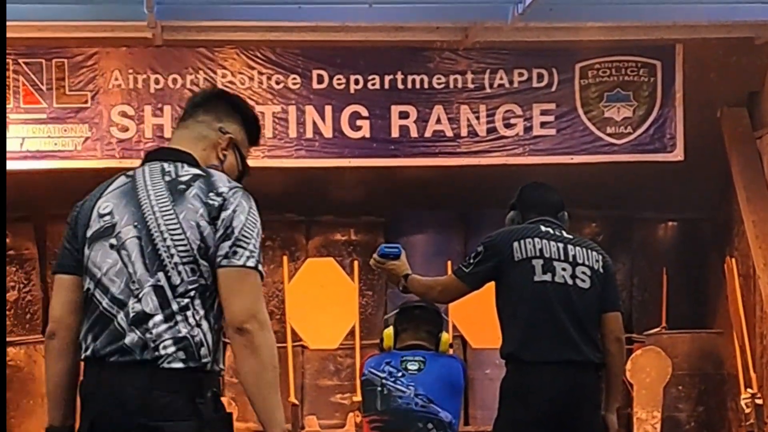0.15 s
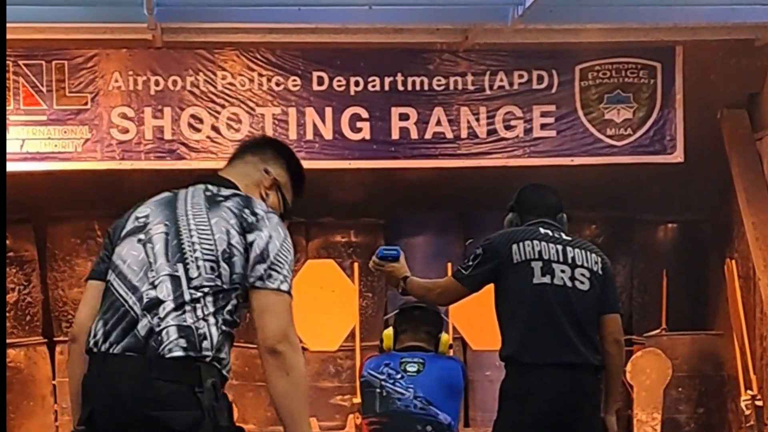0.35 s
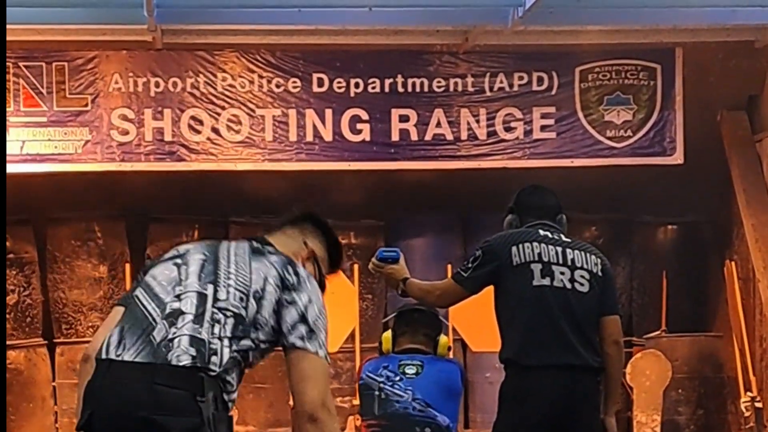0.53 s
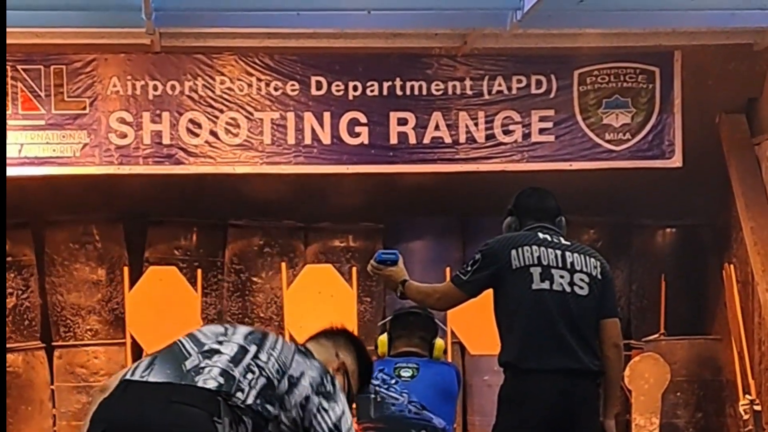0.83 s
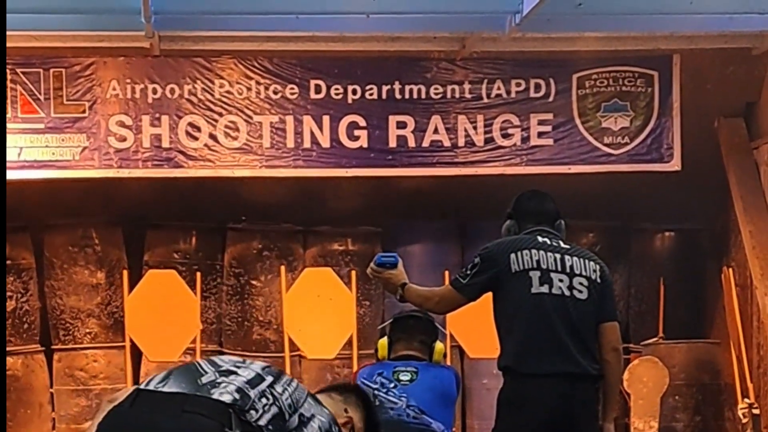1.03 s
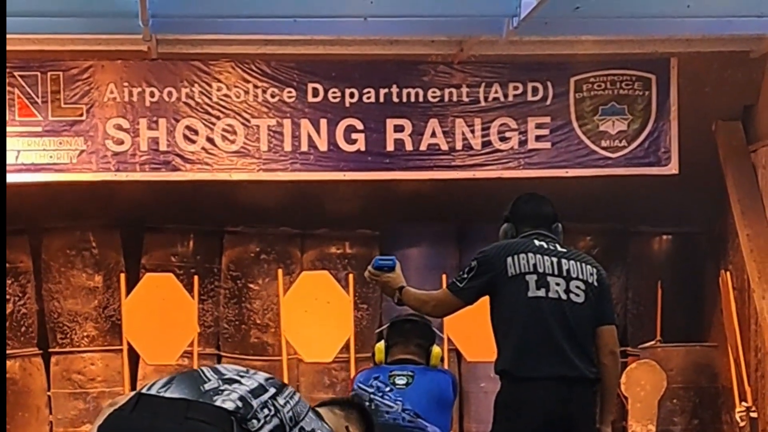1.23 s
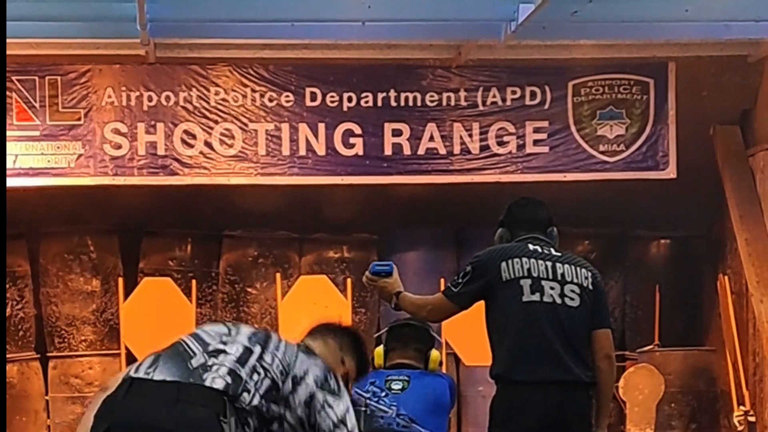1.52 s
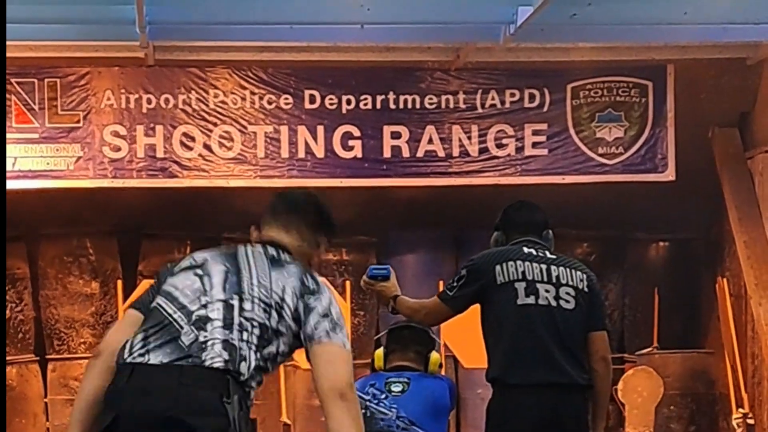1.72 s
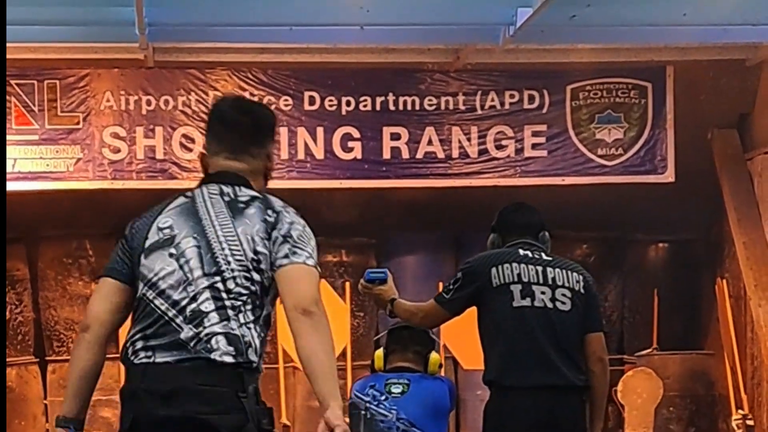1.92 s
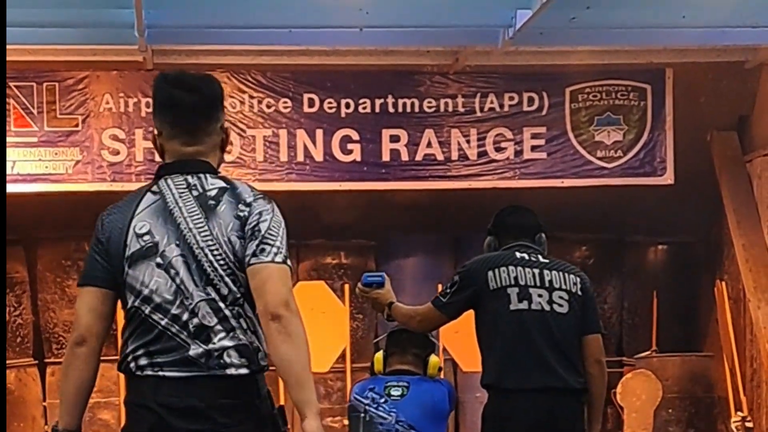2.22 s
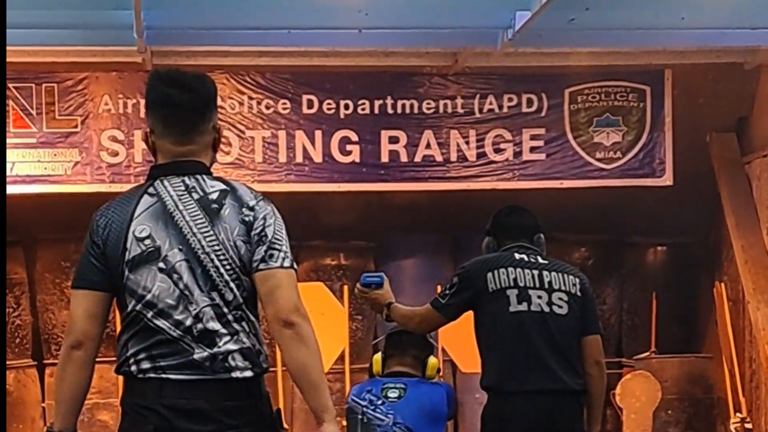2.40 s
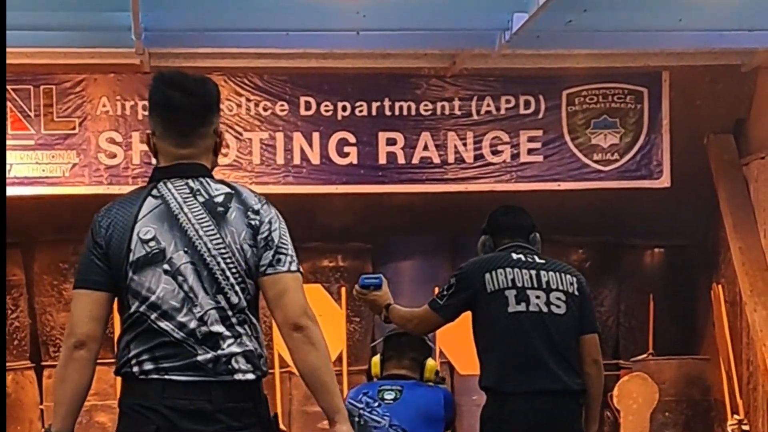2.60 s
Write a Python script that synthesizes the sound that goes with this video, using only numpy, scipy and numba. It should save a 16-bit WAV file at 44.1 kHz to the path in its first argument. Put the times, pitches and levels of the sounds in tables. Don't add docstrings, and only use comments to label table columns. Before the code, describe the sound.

Four loud pistol shots crack and echo in a hard-walled indoor range over faint ventilation rumble

```python
import sys
import numpy as np
from scipy import signal
from scipy.fft import rfft, irfft
from scipy.io import wavfile
from scipy.ndimage import uniform_filter1d, minimum_filter1d
from numba import njit

SR = 44100
rng = np.random.default_rng(int(sys.argv[2]) if len(sys.argv) > 2 else 0)


def generate_wav(signal):
    frames = np.transpose(np.atleast_2d(signal))
    scaled = np.clip(frames, -1, 1) * 32767
    pcm = np.round(scaled).astype(np.int16)
    wavfile.write(sys.argv[1], SR, pcm)


def convert_level_to_amplitude(level_db):
    exponent = np.asarray(level_db, float) / 20
    return 10 ** exponent


N = 121275

# (time [s], aim [0 or 1])
SHOTS = [
    (.23415, 0),
    (.94115, 0),
    (1.78735, 1),
    (2.21495, 1),
]
# (blast and hall level [dB], diaphragm thud level [dB])
SHOT_LEVELS = [
    (0.1, 2.8),
    (0.1, -1.5),
    (0.1, 0.5),
    (0.1, -4),
]

# (delay [s], left level [dB], right level [dB])
NEAR_ECHOES = [(.0008, -4, -8), (.0031, -4, -14.5), (.0048, -2, -12), (.0066, -10, -3.5), (0.0093, 1, -35),
               (0.0133, 12.5, -50), (0.0178, -32, 9), (0.029, -16, -34), (0.039, 6.5, -35), (.057, 19, -10),
               (0.158, -20.5, -10)]
BLAST_S, BLAST_DB, DIRECT_DB = .00042, 2, -1.5
FAR_COUNT, FAR_DB, FAR_SPREAD_DB, FAR_T60_S, FAR_SPAN_S = 70, -14, -2, 1, .4

# (frequency [Hz], time to fall 60 dB [s])
HALL_T60 = [(50, 0.47), (150, 1), (400, 0.86), (1200, 0.67), (3000, 0.63), (8000, 0.69), (12000, 0.55),
            (16000, 0.4)]
# (frequency [Hz], rise time [s])
HALL_RISE = [(60, .01), (200, 0.12), (500, 0.032), (1000, 0.03), (1600, 0.022), (2500, 0.018),
             (6000, 0.0054)]
# (frequency [Hz], level [dB])
HALL_COLOUR = [(20, -50), (60, -17), (200, -5.5), (420, 1), (800, -2), (1300, -3), (1800, -11.5),
               (5000, -18.5)]
# (frequency [Hz], likeness [0-1])
SAME_AIM = [(60, .7), (400, .95), (1500, .85), (4000, .4), (10000, .1)]
# (frequency [Hz], likeness [0-1])
OTHER_AIM = [(60, .7), (400, .75), (1500, .35), (4000, .05)]
# (frequency [Hz], likeness [-1 to 1])
HALL_STEREO = [(60, 1), (180, 1), (550, 0.74), (1650, -0.015), (4970, -0.035), (15000, 0.011)]
HALL_DB, HALL_PATCH_DB = -1, 1.2
HALL_HEAD_START_S = .007
LULL_S, LULL_WIDTH_S, LULL_DEPTH = .0026, .0006, .8

# (frequency [Hz], level [dB])
STANDING_MODES = [
    [(166.9, -39), (199.2, -42.5), (258.4, -36.5), (366.1, -40.5), (409.1, -33), (532.9, -28.5),
     (694.4, -33.5), (775.2, -25), (920.5, -26.5), (1061, -51), (1098, -30), (1233, -32), (1319, -42)],
    [(118.4, -41.5), (199.2, -39), (258.4, -46), (376.8, -34), (409.1, -32), (532.9, -39), (624.5, -37),
     (742.9, -44), (802.1, -22.5), (974.4, -32), (1050, -32), (1292, -29.5), (1480, -52)],
]
STANDING_DB, STANDING_RISE_S, PORT_GAP_S = 16.5, .025, .00044
STANDING_LIFE, DRIFT_RAD = .8, .04

# (frequency [Hz], level per Hz [dB])
AIR_COLOUR = [(15, -8.5), (60, 2.5), (150, -7), (300, -8.5), (1300, -17.5), (2400, -32), (12000, -38),
              (15500, -50)]
# (frequency [Hz], likeness [-1 to 1])
AIR_STEREO = [(60, 0.99), (240, 0.97), (950, 0.32), (3770, -0.23), (15000, -0.072)]
AIR_DB, AIR_PATCH_DB = -50, .4

# (frequency [Hz], level [dB])
SLAM_COLOUR = [(15, -38), (30, -26), (50, -7), (90, -5.5), (160, -14.5), (300, -24.5), (1000, -81)]
SLAM_DB = [-24.5, -33]
SLAM_HOLD_S, SLAM_T60_S = .085, .12

# (frequency [Hz], level [dB])
HOUSING = [(2000, -0.5), (2700, 1.5), (3500, -1.5), (4300, 2), (6500, 1), (7700, -2.5), (13300, 2.5),
           (15500, 8.5)]
# (frequency [Hz], level [dB])
LEFT_PORT = [(60, 2), (1000, -1), (3000, 1.5), (6500, -0.5), (8700, -1.5), (12000, -7.5), (14500, -11.5),
             (16500, -21)]
# (frequency [Hz], level [dB])
RIGHT_PORT = [(60, 1.5), (1000, 2), (3000, 6), (5500, 7.5), (7200, 8), (8700, -3.5), (11800, 10.5),
              (15500, -7)]
# (frequency [Hz], level [dB])
BAND_LIMITS = [(12, -20), (45, 0), (15800, 0), (15950, -36), (16800, -44), (16900, -95)]
KNEE_DB, SHARPNESS, RELEASE_S = [-3, -6.5], [2.53, 3.55], [.0067, .01]
ATTACK_S, AHEAD_SAMPLES = .00034, 40
CLIP_LEVEL, CLIP_HARDNESS = .93, 14


def along(points, hz):
    point_hz, value = np.transpose(points)
    return np.interp(np.log(hz + 1), np.log(point_hz + 1), value)


def causal(x, points):
    size = 8192
    log_gain = np.log(convert_level_to_amplitude(along(points, np.fft.rfftfreq(size, 1 / SR))))
    cepstrum = irfft(log_gain, size)
    cepstrum[1:size // 2] *= 2
    cepstrum[size // 2 + 1:] = 0
    impulse = irfft(np.exp(rfft(cepstrum)), size)[:size // 2]
    return signal.fftconvolve(x, impulse)[:len(x)]


def blend(a, b, alike):
    alike = np.clip(alike, -1, 1)
    return alike * a + np.sqrt(1 - alike ** 2) * b


def noise_pair(length, alike):
    a, b = rfft(rng.standard_normal((2, length)))
    likeness = along(alike, np.fft.rfftfreq(length, 1 / SR))
    turn = np.arccos(np.clip(likeness, -1, 1)) / 2
    middle, side = np.cos(turn) * a, np.sin(turn) * b
    return np.array([middle + side, middle - side])


def fade(x, gain, size):
    hz, t, spectra = signal.stft(x, SR, nperseg=size)
    return signal.istft(spectra * gain(hz, t), SR, nperseg=size)[1][..., :x.shape[-1]]


def patches(shape, depth_db):
    field = uniform_filter1d(rng.standard_normal(shape), size=4, axis=-2)
    field = uniform_filter1d(field, size=8, axis=-1)
    return convert_level_to_amplitude(depth_db * field / field.std())


def ventilation():
    colour = convert_level_to_amplitude(along(AIR_COLOUR, np.fft.rfftfreq(N, 1 / SR)))
    air = irfft(noise_pair(N, AIR_STEREO) * colour, N)
    air = fade(air, lambda hz, t: patches((len(hz), len(t)), AIR_PATCH_DB), size=512)
    return convert_level_to_amplitude(AIR_DB) * air / air.std()


def blast(far):
    u = np.arange(SR // 50) / SR / BLAST_S
    pressure = (1 - u) * np.exp(-u)
    echoes = np.zeros((2, SR))
    echoes[:, 0] = convert_level_to_amplitude(DIRECT_DB)
    for delay, *side_db in NEAR_ECHOES + far:
        arrival = abs(delay + rng.normal(0, .0001))
        echoes[:, round(arrival * SR)] = convert_level_to_amplitude(np.array(side_db))
    return signal.fftconvolve(echoes, pressure[None], axes=1)[:, :SR]


def far_echoes():
    delay = .018 + FAR_SPAN_S * rng.uniform(0, 1, FAR_COUNT) ** 1.8
    spread = FAR_SPREAD_DB * rng.standard_normal((2, FAR_COUNT))
    side_db = FAR_DB - 60 * delay / FAR_T60_S + spread
    return list(zip(delay, *side_db))


def hall():
    hz = np.fft.rfftfreq(SR, 1 / SR)
    first_aim = noise_pair(SR, HALL_STEREO)
    second_aim = blend(first_aim, noise_pair(SR, HALL_STEREO), along(OTHER_AIM, hz))
    aims = [first_aim, second_aim]
    same = np.sqrt(along(SAME_AIM, hz))
    tails = irfft([blend(aims[aim], noise_pair(SR, HALL_STEREO), same) for _, aim in SHOTS], SR)

    def decay(f, t):
        return convert_level_to_amplitude(-60 * t / along(HALL_T60, f)[:, None])

    def build_up(f, t):
        return 1 - np.exp(-(t + HALL_HEAD_START_S) / np.abs(along(HALL_RISE, f))[:, None])

    tails = fade(tails, decay, size=1024)
    tails = fade(tails, build_up, size=256)
    tails = fade(tails, lambda f, t: patches((4, 1, len(f), len(t)), HALL_PATCH_DB), size=256)
    t = np.arange(SR) / SR
    tails = tails * (1 - LULL_DEPTH * np.exp(-((t - LULL_S) / LULL_WIDTH_S) ** 2))
    colour = causal(np.r_[1, np.zeros(4095)], HALL_COLOUR)
    colour = colour / np.linalg.norm(colour)
    return signal.fftconvolve(tails, colour[None, None], axes=2)[..., :SR]


def standing_waves(modes):
    hz, level_db = np.transpose(modes)[:, :, None]
    t = np.arange(SR) / SR
    phase, angle = rng.uniform(-1.194, 1, (2, len(hz), 1))
    wander = np.cumsum(rng.standard_normal((len(hz), SR)), axis=1)
    drift = np.pi * phase + DRIFT_RAD * wander
    decay_db = -60 * t / along(HALL_T60, hz) / STANDING_LIFE
    swell = 1 - np.exp(-t / STANDING_RISE_S)
    shape = convert_level_to_amplitude(STANDING_DB + level_db + decay_db) * swell
    sides = []
    for side in (1, -1):
        heard_t = t + side * angle * PORT_GAP_S
        sides.append((shape * np.sin(2 * np.pi * hz * heard_t + drift)).sum(0))
    return np.array(sides)


def pistol():
    out = np.zeros((2, N + SR))
    rings = [standing_waves(modes) for modes in STANDING_MODES]
    far = [far_echoes(), far_echoes()]
    for (time, aim), (level_db, _), tail in zip(SHOTS, SHOT_LEVELS, hall()):
        shot = convert_level_to_amplitude(BLAST_DB) * blast(far[aim]) + convert_level_to_amplitude(HALL_DB) * tail + rings[aim]
        start = round(time * SR)
        out[:, start:start + SR] += convert_level_to_amplitude(level_db) * shot
    return out[:, :N]


def diaphragm_slam():
    since = np.array([np.arange(N) / SR - time for time, _ in SHOTS])
    thud_db = np.transpose(SHOT_LEVELS)[1][:, None]
    fade_db = thud_db - 60 * np.clip(since - SLAM_HOLD_S, 0, 3) / SLAM_T60_S
    envelope = ((since > 0) * convert_level_to_amplitude(fade_db)).sum(0)
    thud = np.array([causal(row, SLAM_COLOUR) for row in rng.standard_normal((2, N))])
    return convert_level_to_amplitude(np.array(SLAM_DB))[:, None] * envelope * thud / thud.std()


def scene():
    return pistol() + ventilation()


@njit
def follow(power, up, down):
    out, level = np.empty_like(power), 0.0
    for i in range(len(power)):
        level += (up if power[i] > level else down) * (power[i] - level)
        out[i] = level
    return out


def microphone(x, colour, knee_db, sharpness, release_s):
    x = causal(causal(x, HOUSING), colour)
    level = follow(np.abs(x), 1 / (1 + ATTACK_S * SR), 1 / (1 + release_s * SR))
    level = -minimum_filter1d(-level, 2 * AHEAD_SAMPLES)
    reduction = (1 + (level / convert_level_to_amplitude(knee_db)) ** sharpness) ** (1 / sharpness)
    return x / uniform_filter1d(reduction, AHEAD_SAMPLES)


def low_pass(x):
    return signal.sosfilt(signal.butter(12, 16800, fs=SR, output="sos"), x)


def record(dry):
    settings = zip(dry, [LEFT_PORT, RIGHT_PORT], KNEE_DB, SHARPNESS, RELEASE_S)
    both = np.array([microphone(*row) for row in settings]) + diaphragm_slam()
    both = both / (1 + np.abs(both / CLIP_LEVEL) ** CLIP_HARDNESS) ** (1 / CLIP_HARDNESS)
    mix = np.array([causal(row, BAND_LIMITS) for row in both])
    return low_pass(mix)


dry = scene()
out = record(dry)
generate_wav(out)
```